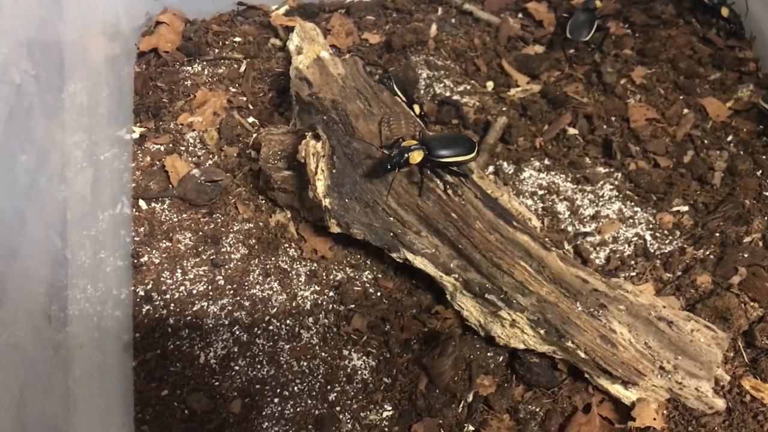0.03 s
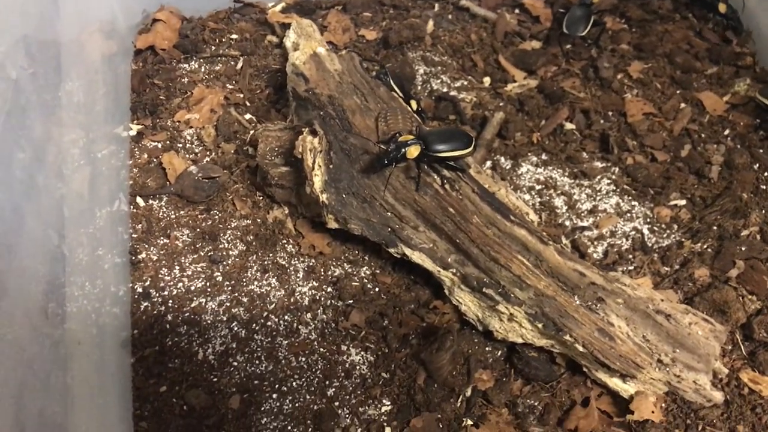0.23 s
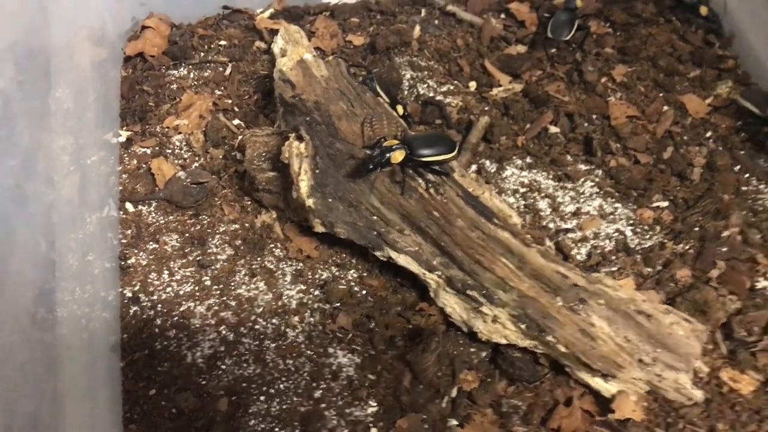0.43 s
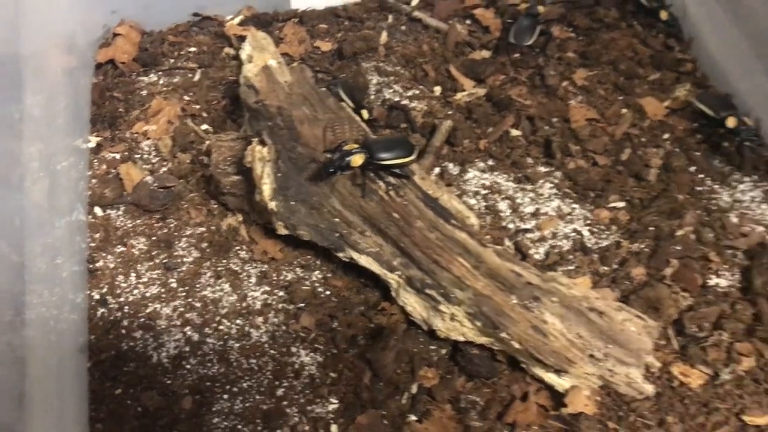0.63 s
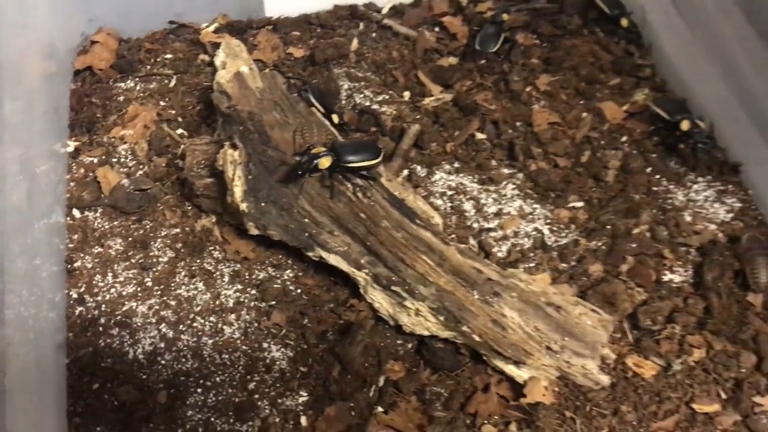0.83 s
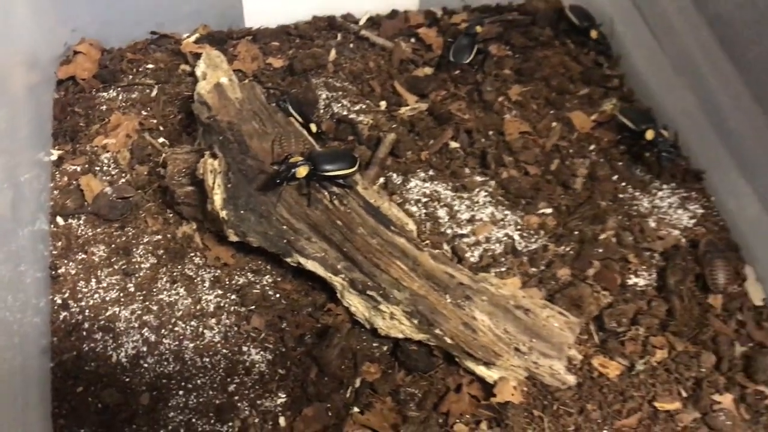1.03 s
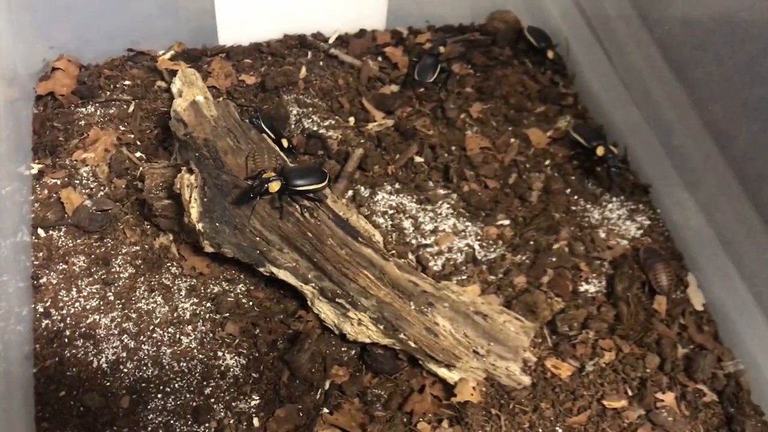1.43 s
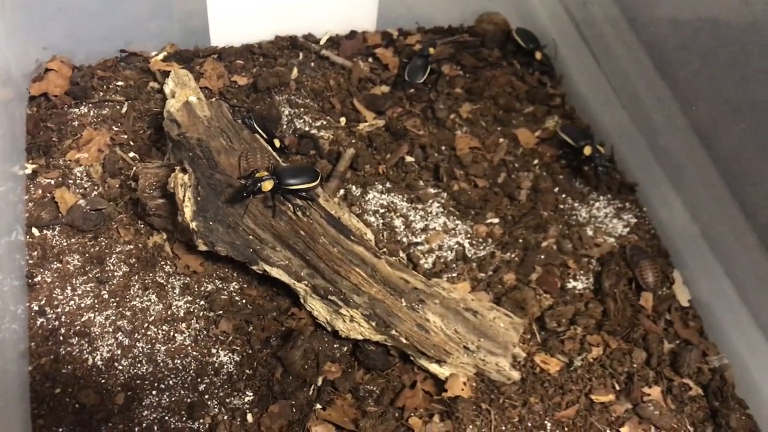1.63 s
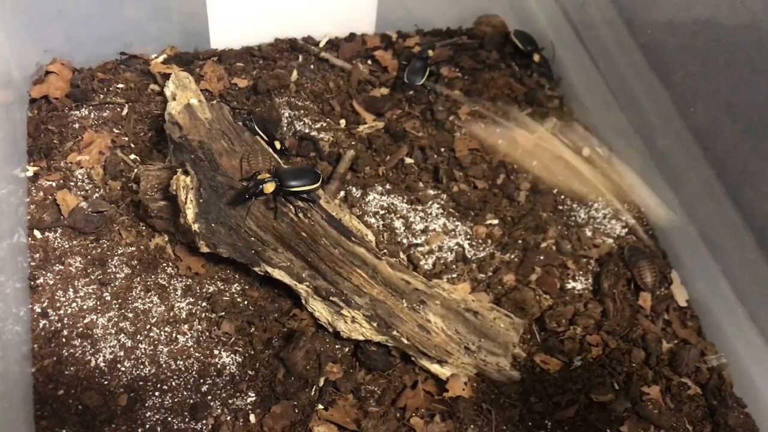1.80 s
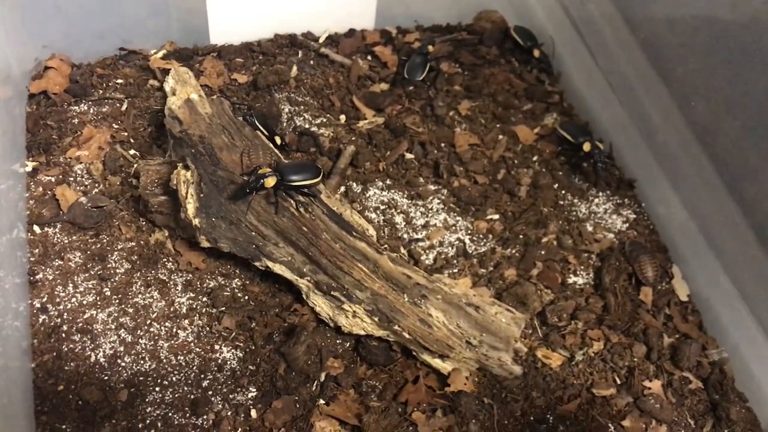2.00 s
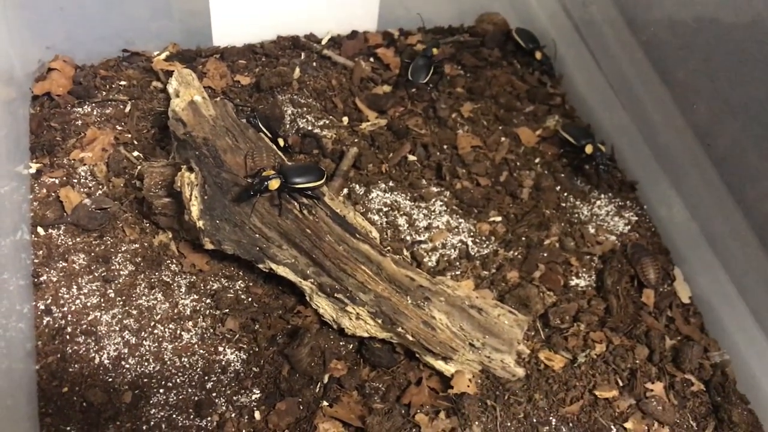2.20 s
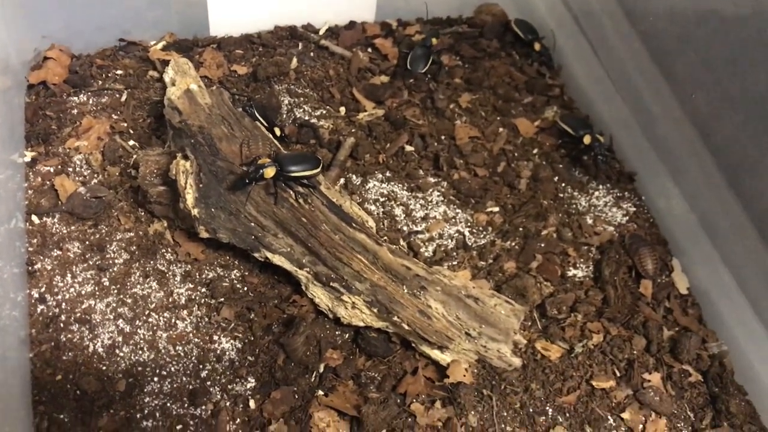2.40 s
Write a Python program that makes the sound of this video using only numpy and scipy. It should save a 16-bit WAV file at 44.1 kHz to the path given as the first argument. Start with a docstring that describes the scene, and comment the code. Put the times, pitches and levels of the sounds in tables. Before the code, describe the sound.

Close to the microphone in a quiet room, a plastic tub clicks and knocks as it is handled. Faint rustles and light taps of beetles on leaves and bark follow, then a brief plastic creak and a sharp snap.

```python
"""Beetles on bark and leaf litter in a plastic tub, one microphone close by in a quiet room.
At the start, handling knocks the tub and sets it ringing. Light taps on the wood follow, while the dry
litter ticks and rustles under the crawling beetles. At 1.8 s one tiny high squeak slips out; at 2 s the
plastic creaks, then snaps, and the thin wall wobbles. A low room rumble and a thin, wavering appliance
whine lie underneath throughout."""
import sys
import numpy as np
from scipy import signal
from scipy.fft import rfft, irfft, next_fast_len
from scipy.io import wavfile
from scipy.ndimage import map_coordinates

SR = 44100
rng = np.random.default_rng(int(sys.argv[2]) if len(sys.argv) > 2 else 0)


def unload_audio(sound):
    """Save the sound as a 16-bit wav file, at the path given as the first command line argument."""
    columns = np.transpose(np.atleast_2d(sound))
    # keep every value between -1 and 1, then stretch to whole-number steps
    steps = np.round(np.clip(columns, -1, 1) * 32767)
    wavfile.write(sys.argv[1], SR, steps.astype(np.int16))


N = 112454


def litter():
    """Dry leaves and bark under the beetles, close up: single ticks over swells of tiny grains."""
    # single ticks (time [s], level [dB], tilt [dB/octave])
    ticks = [(.176, -36.5, -1), (0.2095, -17.5, -5), (.2135, -23, -8), (.2248, -28, -2), (0.2279, -25, 4),
             (.2638, -38, 5), (0.295, -46, -8), (0.3863, -27, 0), (0.4996, -24.5, 6.5), (.5648, -37, 8),
             (.638, -31.5, 7), (0.658, -34, 2), (0.7921, -33.5, -4), (.8225, -33.5, -1.5), (.8322, -28, 12),
             (0.8371, -36, -5), (.9667, -34, 2.5), (0.9716, -34.5, -1.5), (.989, -46, -5),
             (1.028, -34, 1.5), (1.1743, -30.5, 8), (1.7953, -39, 3.5), (2.1717, -26.5, 0.5)]
    # spectrum of a tick (frequency [Hz], level [dB])
    tick_colour = [(300, -23), (2200, -3), (3800, 3.5), (6000, 1), (9000, 7), (13000, 6), (16000, 4)]
    # swells (peak time [s], 20 dB rise [s], 20 dB fall [s], level [dB], tilt [dB/octave])
    rustles = [(.14, 0.17, 0.056, -67.5, -3.5), (.228, 0.048, .05, -57.5, -6.5),
               (0.297, 0.011, 0.01, -54.5, 2.5), (0.371, 0.087, 0.046, -56.5, 1),
               (.47, 0.033, 0.016, -64.5, -1), (.568, .006, 0.069, -62.5, 0), (.645, 0.034, 0.15, -68.5, 0),
               (.735, 0.082, .04, -74.5, 3), (0.782, 0.013, 0.058, -60.5, -3),
               (0.837, 0.018, 0.038, -59.5, 1.5), (.99, 0.14, 0.12, -64, 2.5),
               (1.199, 0.014, 0.021, -46.5, 1), (1.796, 0.0046, 0.018, -56.5, 2.5),
               (1.817, 0.012, 0.011, -46.5, 1), (2.174, 0.0098, 0.033, -65, 0)]
    # spectrum of a rustle (frequency [Hz], level [dB])
    rustle_colour = [(300, -4), (2200, -23.5), (3800, -4.5), (6000, -2.5), (9500, -2.5), (13200, 2.5),
                     (16000, 0)]
    x, t, stream = np.zeros(N), np.arange(N) / SR, grains()
    for s, db, tilt_db in ticks:
        tick = crack(t60=0.011, grit=1.8) + echoes(early_db=-5.5, early_t60=0.021, late_db=-13)
        add(x, s, amp(db) * coloured(tick, tick_colour, tilt_db))
    for s, rise, fall, db, tilt_db in rustles:
        swell_db = -20 * np.where(t < s, (s - t) / rise, (t - s) / fall) ** 1.72
        x += coloured(amp(db + swell_db) * stream, rustle_colour, tilt_db)
    return x


def grains(per_s=5000, spread_db=3.6, life_s=0.00018):
    """The stuff of a rustle: a dense stream of tiny pings, each with its own pitch and size."""
    where, pitch, rank = rng.random((int(per_s * N / SR), 3)).T[:, :, None]
    k = np.arange(SR // 400)
    size = amp(-spread_db * np.log(rank + 0.0028))  # many faint, a few loud
    pings = size * np.exp(-k / SR / life_s) * np.sin(np.pi * pitch * k)
    samples = (where * N).astype(int) + k
    return unit(np.bincount(samples.ravel(), pings.ravel(), N)[:N])


def taps():
    """Light dry contacts with the wood."""
    # taps (time [s], level [dB], tilt [dB/octave])
    contacts = [(.3488, -30, 7), (.5715, -40, 2.5), (.5968, -37.5, 0.5), (.6228, -32.5, 4),
                (.637, -32.5, 0), (.6497, -33.5, -5)]
    # spectrum of a tap (frequency [Hz], level [dB])
    colour = [(150, -22), (450, -12), (800, 0), (1600, -1), (2800, -4), (4000, -16), (12000, -24)]
    x = np.zeros(N)
    for s, db, tilt_db in contacts:
        tap = crack(t60=0.006, grit=1.1) + echoes(early_db=-11, early_t60=0.05, late_db=-12)
        add(x, s, amp(db) * coloured(tap, colour, tilt_db))
    return x


def squeak(peak_s=1.8193, peak_hz=11650, chirp_db=-10, sweep_db=-40.5):
    """A tiny scrape sweeps upward and ends in a very short, high chirp that echoes in the tub."""
    # spectrum of the chirp's echoes (frequency [Hz], level [dB])
    echo_colour = [(2000, -38), (3700, -25), (7400, -11), (8700, -3), (10200, -6), (11400, 6), (12300, -4),
                   (13200, 2), (14300, -16), (16000, -29)]
    octaves_per_s, rise_s, width_s = 290, 0.0025, 0.00037
    undertone_hz, undertone_db = 8470, -13
    t = np.arange(N) / SR - peak_s
    glide_hz = peak_hz * 2 ** (octaves_per_s * np.minimum(t, 0)) * (1 + 0.12 * wobble(4000))
    envelope = np.exp(np.minimum(t / rise_s, -t / width_s))
    sweep = envelope * np.sin(2 * np.pi * np.cumsum(glide_hz) / SR) * wobble(2000)
    tones = np.sin(2 * np.pi * peak_hz * t) + amp(undertone_db) * np.sin(2 * np.pi * undertone_hz * t)
    chirp = np.exp(-np.abs(t) / width_s) * tones
    x = amp(chirp_db) * chirp / np.linalg.norm(chirp) + amp(sweep_db) * sweep
    tail = echoes(early_db=-7.5, early_t60=0.045, late_db=-19.5)
    add(x, peak_s, amp(chirp_db) * coloured(tail, echo_colour))
    return x


def knocks():
    """Handling noise near the microphone: dull contacts that ring the tub."""
    # knocks (time [s], contact level [dB], tilt [dB/octave], ring level [dB])
    contacts = [(0.2059, -14.5, 7.5, -17.5), (0.2086, -12.5, -3.5, -36), (0.2263, -26.5, 6.5, -46),
                (0.2954, -17, -1.5, -42.5), (.2978, -16.5, 1.5, -44.5)]
    # spectrum of a contact (frequency [Hz], level [dB])
    colour = [(50, -28), (150, 7), (330, 2.5), (500, -4.5), (850, 4), (1800, -1), (2700, -2.5),
              (3800, -15.5), (7000, -25), (15000, -31.5)]
    # the tub's ring (frequency [Hz], level [dB], t60 [s])
    modes = [(62.5, -28, 0.5), (101.7, -23.5, 0.29), (167, -30, .14), (287, -14, 0.076), (687, -25, 0.22),
             (768, -19.5, .12), (817, 2, .018), (880, -29, 0.037), (1370, -23.5, 0.04), (1857, -6, 0.021),
             (2665, -20, 0.03)]
    x, body = np.zeros(N), np.zeros(N)
    for s, db, tilt_db, ring_db in contacts:
        blow = crack(t60=0.0073, grit=1.46) + echoes(early_db=-9.5, early_t60=0.097, late_db=-13)
        add(x, s, amp(db) * coloured(blow, colour, tilt_db))
        add(body, s, amp(ring_db) * ring(modes, attack_s=0.0012))
    tail = signal.fftconvolve(body, echoes(early_db=-9, early_t60=0.096, late_db=-14.5))[:N]
    return x + body + tail


def snaps():
    """The handled plastic pops stiffly, and each pop echoes."""
    # pops (time [s], level [dB], tilt [dB/octave])
    pops = [(2.2211, -38.5, -2.5), (2.2374, -9.5, 0.5), (2.2701, -23.5, 8.5)]
    # spectrum of the direct sound (frequency [Hz], level [dB])
    colour = [(60, -3), (200, -1), (350, -9), (600, -15), (1100, -7), (1750, 8.5), (2500, 0), (4200, -1.5),
              (5500, -5.5), (7000, 4), (8300, 6), (9500, -21), (11500, -5), (15000, -24)]
    # smoother spectrum of the echoes (frequency [Hz], level [dB])
    echo_colour = [(100, -3), (500, -8), (1000, -1), (1800, 5.5), (3500, -0.5), (5500, -8), (8200, -3),
                   (9500, -5), (12000, -10), (15000, -12)]
    x = np.zeros(N)
    for s, db, tilt_db in pops:
        add(x, s, amp(db) * coloured(crack(t60=0.0074, grit=2.1), colour, tilt_db))
        tail = echoes(early_db=-3.5, early_t60=0.081, late_db=-9)
        add(x, s, amp(db) * coloured(tail, echo_colour, tilt_db))
    return x


def creak():
    """A quick run of slips in the plastic makes one short creak."""
    # slips (time [s], level [dB], tilt [dB/octave], t60 [s])
    slips = [(2.0146, -31, 1.5, 0.016), (2.0165, -22.5, -12, 0.0063), (2.021, -25, 0.5, .004),
             (2.023, -17.5, 4, .012), (2.0253, -13, 2.5, 0.016), (2.0307, -20, 3, 0.016),
             (2.0332, -21.5, -2.5, 0.021), (2.042, -30, 2, 0.0073), (2.0486, -30, 6, .004),
             (2.0644, -28, 3, 0.03)]
    # spectrum of a slip (frequency [Hz], level [dB])
    colour = [(80, -9), (400, -8.5), (580, -7.5), (750, 3), (900, -1.5), (1350, 0), (1750, 9.5),
              (2300, -2.5), (3800, -5), (6000, -15), (9500, -23.5), (12500, -17), (15500, -26)]
    x = np.zeros(N)
    for s, db, tilt_db, t60 in slips:
        slip = crack(t60, grit=1.5) + echoes(early_db=-10, early_t60=0.094, late_db=-12.5)
        add(x, s, amp(db) * coloured(slip, colour, tilt_db))
    return x


def wall():
    """The tub's thin wall flexes at a jolt and gives a low wobble."""
    # jolts (time [s], level [dB])
    flexes = [(0.2954, -50), (2.029, -44.5), (2.241, -39.5), (2.273, -48.5)]
    # the wall's ring (frequency [Hz], level [dB], t60 [s])
    modes = [(55.5, -15, 0.35), (109.7, -7.5, 0.16), (154.8, -3.5, 0.11), (205, -0.5, 0.094),
             (247, -51, .08)]
    x = np.zeros(N)
    for s, db in flexes:
        add(x, s, amp(db) * ring(modes, attack_s=0.0014))
    return x


def echoes(early_db, early_t60, late_db, onset_s=0.00074):
    """Quick echoes between the tub's walls, then the tail of the room beyond."""
    # the room's decay (frequency [Hz], t60 [s])
    room_t60 = [(100, 0.25), (300, 0.67), (800, 0.35), (2000, 0.35), (5000, 0.37), (9000, 0.32),
                (15000, 0.2)]
    hz, t, spectra = signal.stft(rng.standard_normal(SR // 2), SR, nperseg=256)
    decay = amp(-60 * t / along(room_t60, hz)[:, None])
    late = signal.istft(spectra * decay, SR, nperseg=256)[1][:SR // 2]
    t = np.arange(len(late)) / SR
    early = rng.standard_normal(len(t)) * amp(-60 * t / early_t60)
    both = amp(early_db) * early / np.linalg.norm(early) + amp(late_db) * late / np.linalg.norm(late)
    return both * (1 - np.exp(-t / onset_s))


def appliance(whine_hz=2669, drift_hz=9.15, flutter_db=1.05):
    """An appliance in the background: narrow bands of hum and a thin whine that comes and goes."""
    # hum bands (frequency [Hz], level [dB], width [Hz])
    bands = [(78.1, -77, 11.75), (249.6, -82, 11), (855, -85.5, 14), (1794, -82.5, 20), (2652, -75, 53)]
    # course of the whine (time [s], level [dB])
    whine_levels = [(0, -75.5), (.85, -78), (1.1, -96), (1.35, -75.5), (1.55, -104), (1.82, -78),
                    (1.97, -70), (2.02, -80), (2.55, -94)]
    hum, t = np.zeros(N), np.arange(N) / SR
    for hz, db, width_hz in bands:
        phase = 2 * np.pi * hz * t
        hum += amp(db) * unit(wobble(width_hz) * np.cos(phase) + wobble(width_hz) * np.sin(phase))
    pitch_hz = whine_hz + drift_hz * wobble(18)
    whine = unit(np.sin(2 * np.pi * np.cumsum(pitch_hz) / SR))
    whine_db = np.interp(t, *np.transpose(whine_levels)) + flutter_db * wobble(15)
    return hum + amp(whine_db) * whine


def room_tone(level_db=-64.5):
    """The quiet room around the tub: steady low rumble and faint hiss."""
    # spectrum of the room tone (frequency [Hz], level [dB])
    colour = [(15, -56), (28, -8), (50, 1.5), (82, 0.5), (150, -7), (277, -4.5), (330, -10), (530, -17),
              (750, -16), (1560, -20.5), (1750, -20), (2350, -23), (2620, -15.5), (2950, -23.5),
              (6400, -32.5), (9000, -33.5), (13000, -32.5), (16000, -32)]
    return amp(level_db) * unit(coloured(rng.standard_normal(N + SR), colour)[SR:])


def crack(t60, grit):
    """A push followed by a brief gritty decay, of unit energy."""
    t = np.arange(SR // 2) / SR
    x = rng.standard_normal(len(t)) * amp(-60 * t / t60)
    x *= grit / np.linalg.norm(x)
    x[0] = 1
    return x / np.linalg.norm(x)


def ring(modes, attack_s):
    """Damped modes of a struck body."""
    t = np.arange(SR // 2) / SR
    tones = sum(amp(db - 60 * t / t60) * np.sin(2 * np.pi * hz * t) for hz, db, t60 in modes)
    return tones * (1 - np.exp(-t / attack_s))


def coloured(x, colour, tilt_db=0, size=4096):
    """x through a causal filter of unit energy, tilted by tilt_db per octave above 500 Hz."""
    hz = np.fft.rfftfreq(size, 1 / SR)
    gain_db = along(colour, hz) + tilt_db * np.log2(np.maximum(hz, 500) / 500)
    cepstrum = irfft(np.log(amp(gain_db)))
    cepstrum[1:size // 2] *= 2  # fold to minimum phase, so attacks stay sharp
    cepstrum[size // 2 + 1:] = 0
    kernel = irfft(np.exp(rfft(cepstrum)))
    return signal.fftconvolve(x, kernel / np.linalg.norm(kernel))[:len(x)]


def wobble(rate):
    """A smooth random curve of rms 1, rate knots a second."""
    return unit(map_coordinates(rng.standard_normal(1024), [np.arange(N) * rate / SR], mode="wrap"))


def along(points, hz):
    """Interpolate (frequency [Hz], value) points on a log frequency axis."""
    knots_hz, values = np.transpose(points)
    return np.interp(np.log(hz + 1), np.log(knots_hz + 1), values)


def amp(db):
    """Decibels to gain."""
    return 10 ** (np.asarray(db) / 20)


def unit(x):
    """Scaled to rms 1."""
    return x / np.sqrt(np.mean(x ** 2) + 1e-20)


def add(track, s, sound):
    """Mix a sound in at s seconds."""
    part = track[round(s * SR):][:len(sound)]
    part += sound[:len(part)]


def scene():
    """The tub close to one microphone, the room behind it."""
    tub = knocks() + taps() + snaps() + creak() + wall() + litter() + squeak()
    return (tub + room_tone() + appliance())[None]


def record(dry):
    """The recorder rolls off the deepest bass and keeps nothing above its band limit."""
    low_cut_hz, top_hz, edge_hz = 38, 15800, 500
    dry = signal.sosfilt(signal.butter(4, low_cut_hz, "high", fs=SR, output="sos"), dry)
    size = next_fast_len(N + SR // 2)
    passband = np.clip((top_hz - np.fft.rfftfreq(size, 1 / SR)) / edge_hz + 0.5, 0, 1)
    return irfft(rfft(dry, size) * passband, size)[..., :N]


dry = scene()
out = record(dry)
unload_audio(out)
```